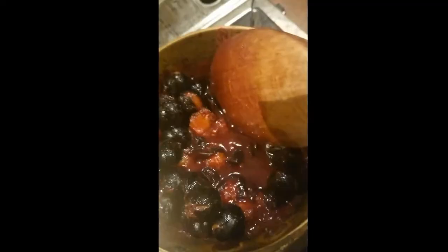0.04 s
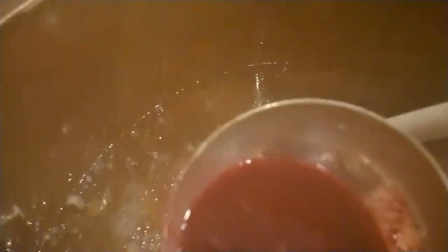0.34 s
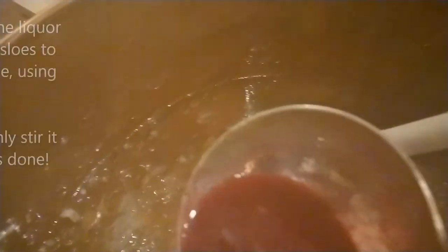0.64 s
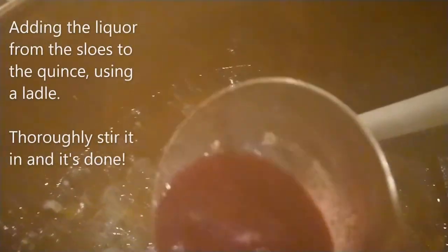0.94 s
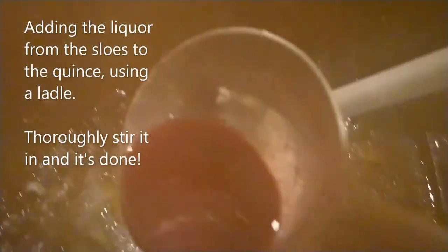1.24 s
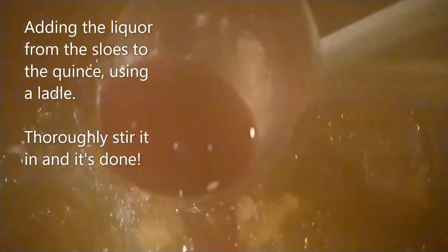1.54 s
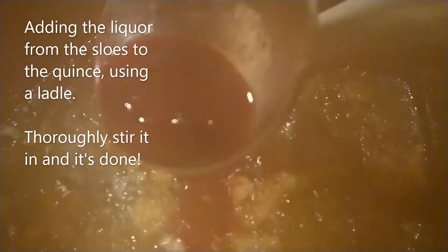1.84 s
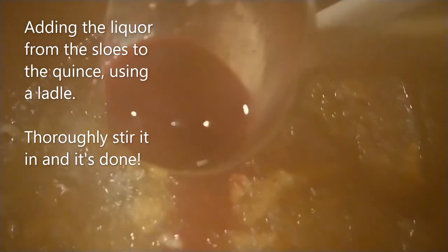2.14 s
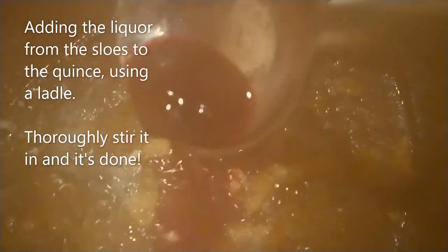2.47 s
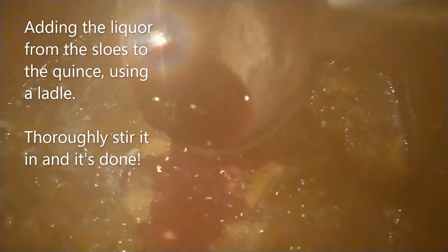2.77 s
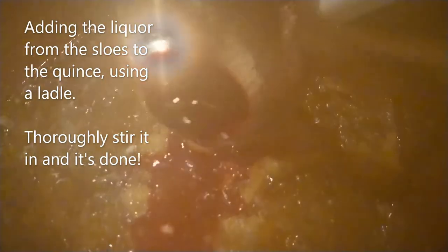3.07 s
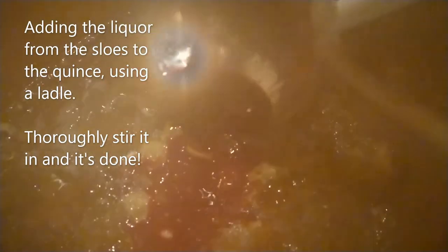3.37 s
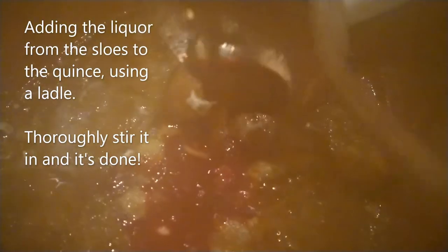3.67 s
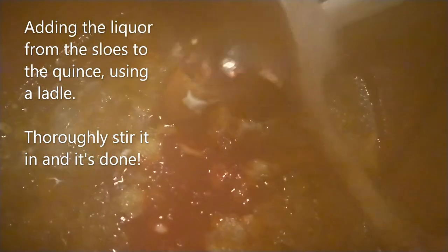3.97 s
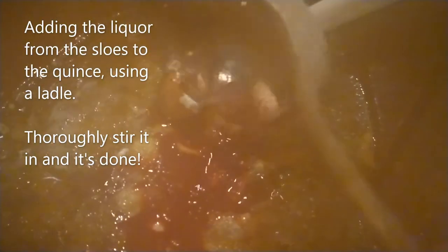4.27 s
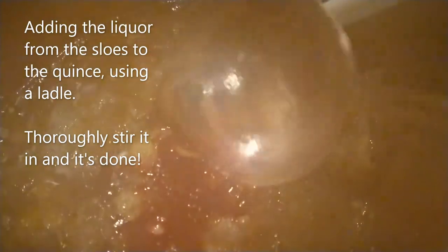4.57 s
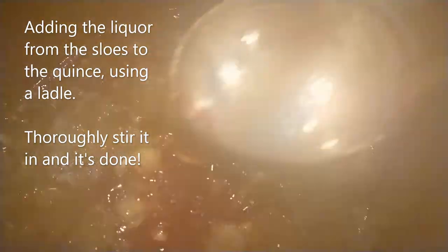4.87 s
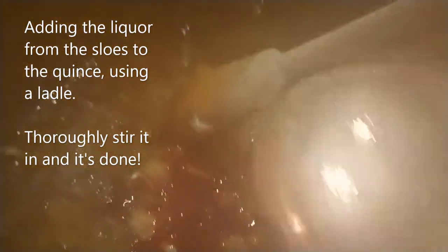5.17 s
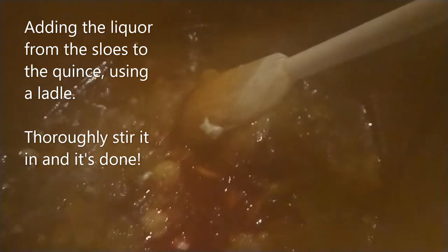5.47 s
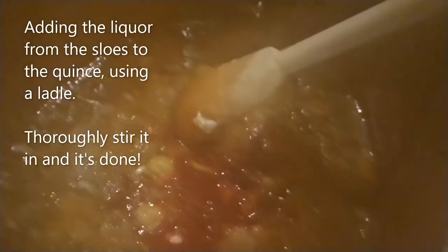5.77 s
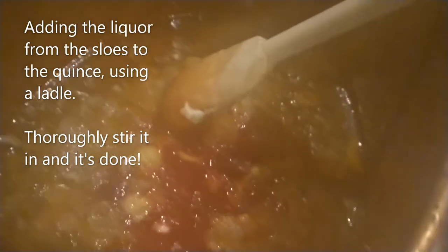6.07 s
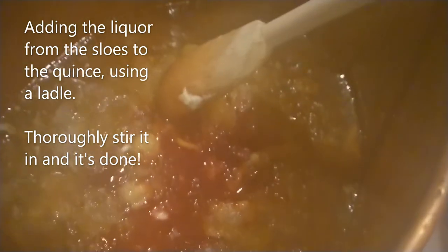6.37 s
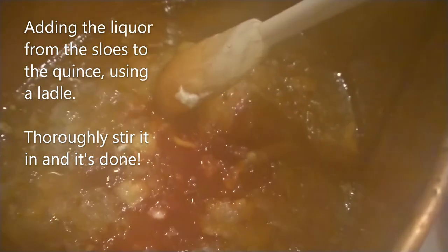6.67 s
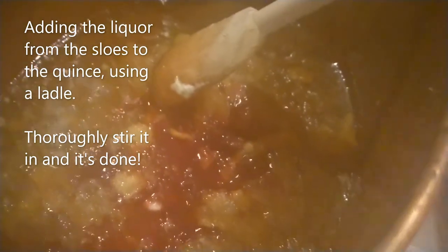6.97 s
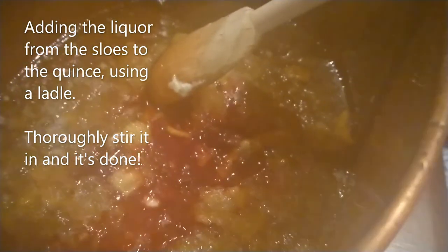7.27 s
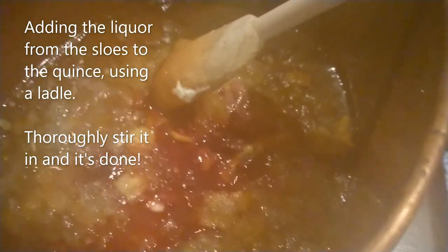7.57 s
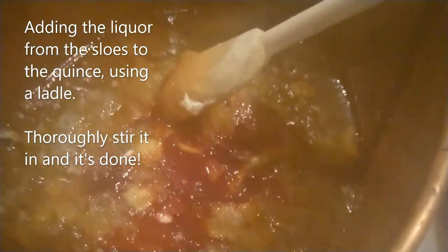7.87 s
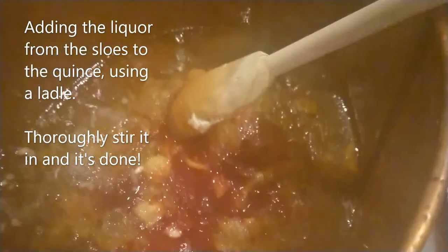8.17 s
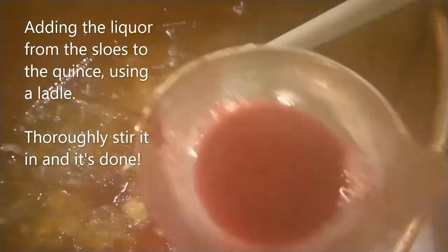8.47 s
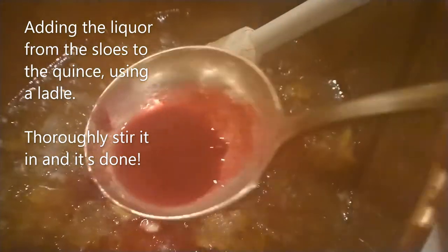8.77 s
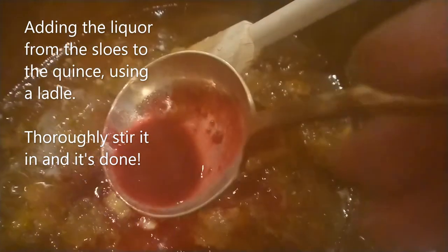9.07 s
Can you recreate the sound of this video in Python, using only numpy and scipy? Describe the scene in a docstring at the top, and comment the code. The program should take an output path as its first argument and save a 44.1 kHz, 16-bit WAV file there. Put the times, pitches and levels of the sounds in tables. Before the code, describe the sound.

After a quick squelch and a second of silence, fruit pulp bubbles and sizzles in a pan, spitting and plopping as juice is ladled in.

```python
"""A moment of wet stirring, about a second of silence, then fruit simmering in a deep steel pan.
Heard from just above the rim while a ladle of juice is tipped in, thousands of small bubbles burst
and ring the air in pan and ladle. A few spit sharply at the surface, larger ones pop and plop in the
pulp, and the cooler juice calms the froth and fizz. A kitchen hum lies under the simmer."""
import sys
import numpy as np
from scipy import signal
from scipy.fft import rfft, irfft
from scipy.io import wavfile
from scipy.ndimage import map_coordinates

SR = 44100
rng = np.random.default_rng(int(sys.argv[2]) if len(sys.argv) > 2 else 0)


def wav_record(signal):
    """Record a signal, one row per channel, as 16-bit PCM in the file named by sys.argv[1]."""
    frames = np.transpose(np.atleast_2d(signal))
    bounded = np.clip(frames, -1, 1)
    # unit amplitude maps onto the largest positive 16-bit level
    quanta = np.round(bounded * 32767).astype(np.int16)
    wavfile.write(sys.argv[1], SR, quanta)


N = 407035
T = np.arange(N) / SR

def amp(db):
    """Decibels to gain."""
    return 10 ** (np.asarray(db) / 20)

def unit_rms(x):
    """Scales a sound so that its centre signal has rms 1."""
    return x / np.sqrt(np.mean(np.atleast_2d(x).mean(0) ** 2) + 1e-20)

def curve(rows):
    """An automation line through (seconds, value) points."""
    return np.interp(T, *np.transpose(rows))

def swells(rows, half_s):
    """Bell-shaped rises or dips in dB, one at each row's moment."""
    return sum(db * np.exp(-((T - s) / half_s) ** 2) for s, db in rows)

def wander(per_s):
    """Slow random drift of rms 1."""
    hz = np.fft.rfftfreq(N, 1 / SR)
    return unit_rms(irfft(rfft(rng.standard_normal(N)) * (hz / per_s) * np.exp(-hz / per_s), N))

def add(mix, s, sound, pan_db=0):
    """Mixes a sound in at time s, leaning left by pan_db."""
    sound = sound * amp([[pan_db / 2], [-pan_db / 2]])
    part = mix[:, max(round(s * SR), 0):][:, :sound.shape[1]]
    part += sound[:, :part.shape[1]]

def band(x, lo_hz, hi_hz):
    """Gentle band-pass."""
    return signal.sosfilt(signal.butter(2, [lo_hz, hi_hz], "band", fs=SR, output="sos"), x)

def eq(x, table):
    """Minimum-phase EQ with one curve for each side."""
    hz, *sides = np.transpose(table)
    log_hz = np.log(abs(np.fft.fftfreq(4096, 1 / SR)) + 1)
    log_gain = np.log(amp([np.interp(log_hz, np.log(hz), side) for side in sides]))
    taps = np.fft.ifft(np.exp(signal.hilbert(log_gain).conj())).real[:, :2048]
    return signal.oaconvolve(np.atleast_2d(x), taps, axes=1)[:, :N]

def clicks(per_s, spread_db):
    """Impulses of random size at random moments."""
    size = amp(spread_db * np.minimum(rng.exponential(1, N), 5.5)) * rng.choice([-1, 1], N)
    return size * (rng.random(N) < per_s / SR)

def walls(t60, wet):
    """A click and its quick reflections between the pan walls, different at each side."""
    t = T[:2048]
    echoes = rng.standard_normal((2, len(t))) * amp(-60 * t / t60)
    echoes *= wet / np.linalg.norm(echoes, axis=1, keepdims=True)
    echoes[[0, 1], rng.integers(0, 20, 2)] += 1  # the direct sound
    return echoes

def crackle(per_s, spread_db, t60, wet, spots=14):
    """Bubbles bursting at many spots of the surface, each spot with its own reflections."""
    train, spot = clicks(per_s, spread_db), rng.integers(0, spots, N)
    heard = (signal.oaconvolve((train * (spot == k))[None], walls(t60, wet), axes=1)
             for k in range(spots))
    return unit_rms(sum(heard)[:, :N])

def pings(lo_hz, hi_hz, per_s, cycles, sizes=30):
    """Small bubbles of many sizes each ring for a few cycles."""
    out, t = np.zeros((2, N)), T[:SR // 60]
    for hz in np.geomspace(lo_hz, hi_hz, sizes):
        ping = np.sin(2 * np.pi * hz * t) * np.exp(-hz * t / cycles)
        heard = signal.fftconvolve(ping[None], walls(t60=.012, wet=1.1), axes=1) / np.sqrt(hz)
        out += signal.oaconvolve(clicks(per_s / sizes, spread_db=2.6)[None], heard, axes=1)[:, :N]
    return unit_rms(out)

def ring(drive, modes):
    """Damped air resonances, heard with their own strength at each side."""
    t, response = T[:SR // 8], 0
    for hz, width_hz, left_db, right_db in modes:
        mode = np.sqrt(width_hz) * np.exp(-np.pi * width_hz * t) * np.sin(2 * np.pi * hz * t)
        response += amp([[left_db], [right_db]]) * mode
    return signal.oaconvolve(drive[None], response, axes=1)[:, :N]

# Dark room tone. Each row: frequency in Hz, left and right gain in dB.
ROOM_EQ = [(22, -10, -8), (54, 6, -12.5), (126, 0, 1), (245, -2.5, -12), (535, -7.5, -5.5),
           (1950, -39, -54)]
# Soft handling thumps. Each row: time in seconds, peak in dB before panning, lean to the left in dB.
HAND_BUMPS = [(1.22, -53, 10), (1.37, -52, 14), (2.41, -52, 0), (3.19, -48, 4), (3.25, -53, 8),
              (4.18, -54, -4), (5.01, -48, -3), (6.43, -54, -6), (7.32, -54, -2), (8.03, -53, 5)]
HUM_HZ, HUM_DB = 100, -72

def kitchen():
    """Low room noise that eases as the hand settles, mains hum and handling bumps."""
    noise = band(rng.standard_normal((2, N)) + .6 * rng.standard_normal(N), 32, 3000)
    rumble = amp(-62.5 - 0.44 * (T - T.mean())) * unit_rms(eq(noise, ROOM_EQ))
    out = rumble + amp(HUM_DB) * np.sin(2 * np.pi * HUM_HZ * T)
    age = T[:SR // 4] / .018  # a bump peaks after 18 ms
    for s, db, pan_db in HAND_BUMPS:
        push = band(rng.standard_normal(len(age)), 40, 150) * age * np.exp(-age)
        add(out, s - .01, amp(db) * push / abs(push).max(), pan_db)
    return out

# The tone of wet fruit. Each row: frequency in Hz, left and right gain in dB.
STIR_EQ = [(59.8, -9, -26.5), (150, -2.5, -1.5), (320, -8.5, -18.5), (604, -1.5, -13.5),
           (1180, -8.5, -14.5), (1860, -6, -20), (2660, -14, -13), (4500, -7.5, -13.5), (6000, -9, -35),
           (9000, -18, -31.5), (15000, -21.5, -43)]
# Wet smacks under the spoon. Each row: start in seconds, relative level in dB.
SPOON_SMACKS = [(0.005, -22.5), (0.029, -33.5), (0.067, -42), (0.09, -27), (0.096, -38), (0.129, -40),
                (0.149, -29), (0.158, -26), (0.169, -27.5)]

def stirring():
    """A wooden spoon turns wet berries: squelch, a hollow gurgle and a few smacks."""
    squelch = unit_rms(eq(crackle(per_s=3300, spread_db=4, t60=.011, wet=1.1), STIR_EQ))
    cavities = [(340, 57, -1.4, -6.5), (1866, 410, -.62, -27)]
    gurgle = unit_rms(ring(clicks(per_s=930, spread_db=-3), cavities)) * np.minimum(T / .075, 1)
    smacks = np.zeros((2, N))
    for s, db in SPOON_SMACKS:
        add(smacks, s, amp(db + 14.5) * walls(t60=.022, wet=2.23))
    return amp(-50) * (squelch + gurgle) + eq(smacks, STIR_EQ)

# The froth's fader. Each row: time in seconds, level in dB.
FROTH_LEVEL = [(1.1, -57.5), (1.9, -53), (3.0, -56.5), (4.2, -59), (5.2, -69), (9.2, -69.5)]
# Its tone. Each row: frequency in Hz, left and right gain in dB.
FROTH_EQ = [(504, -7.5, -13.5), (930, -8.5, -8), (1370, -4.5, 0.5), (2070, -17, -41), (3140, -5, -15),
            (4400, -25, -5.5), (4960, -7, -10), (5370, -2.5, -17.5), (6500, -15, -32), (9450, -23.5, -23)]

def froth():
    """A patch of froth crackles, calming as the cooler juice runs in."""
    bubbles = crackle(per_s=5000, spread_db=5, t60=.031, wet=1.9)
    return amp(curve(FROTH_LEVEL)) * unit_rms(eq(bubbles, FROTH_EQ))

# Bright top end of the fizz. Each row: frequency in Hz, left and right gain in dB.
FIZZ_EQ = [(1560, -80, -64), (3910, 12, -28), (5600, 9.5, 3), (8900, 2.5, -1), (10370, 5, 3.5),
           (11600, -1.5, -2), (15000, -12.5, -9.5)]
# Sprays of very fine spitting. Each row: centre in seconds, lift of the snaps in dB.
FINE_SPRAYS = [(1.5, 2), (2.37, 2), (2.62, 3), (3.37, 2.5), (3.52, 2.5), (3.95, 3), (4.3, 2), (5.75, 3),
               (6.06, 3), (7.22, 3), (7.65, 3), (8.9, 4), (9.14, 3)]
FIZZ_START_DB, FIZZ_SETTLED_DB, CALMING_S = -56.5, -75, 9.1

def fizz(surge_db):
    """Tiny films snap and small bubbles tick in sputtering clumps; the cooler juice calms them."""
    snaps = unit_rms(eq(crackle(per_s=2700, spread_db=3.5, t60=.044, wet=7.8), FIZZ_EQ))
    heat = np.exp(-np.maximum(T - SIMMER_START_S, 0) / CALMING_S)
    sputter_db = 1.5 * wander(per_s=7) + swells(FINE_SPRAYS, half_s=.055)
    level_db = FIZZ_SETTLED_DB + (FIZZ_START_DB - FIZZ_SETTLED_DB) * heat + 1.3 * surge_db + sputter_db
    ticks = amp(-64.5 + .7 * (level_db - level_db.mean())) * pings(4200, 14000, per_s=420, cycles=2)
    return amp(level_db) * snaps + ticks

# Air modes of the ladle. Each row: base pitch and width in Hz, left and right gain in dB.
LADLE_MODES = [(1855, 66, -20, 4), (2180, 170, -14, -5.5), (3030, 130, -26, .5), (3790, 100, -26, -2)]
# The ladle's fader. Each row: time in seconds, level in dB before surges.
LADLE_LEVEL = [(1.1, -57), (1.42, -54), (1.6, -48.5), (2.3, -47.5), (3.3, -48), (3.85, -49.8), (4.4, -55.5),
               (4.9, -56), (8.6, -66), (9.1, -59)]
# Its pitch bend. Each row: time in seconds, pitch ratio.
LADLE_BEND = [(1.1, 1), (1.9, 1.015), (3.0, .995), (4.0, .96), (9.2, .955)]

def ladle_ring(surge_db):
    """Small bubbles ring the air in the ladle, whose pitch sinks as the juice leaves it."""
    bowl = ring(band(clicks(per_s=900, spread_db=1.5), 1885, 3970), LADLE_MODES)
    read_position = np.cumsum(curve(LADLE_BEND))
    bent = np.array([map_coordinates(side, [read_position], order=3) for side in bowl])
    return amp(curve(LADLE_LEVEL) + .67 * surge_db) * unit_rms(bent)

# Deep and high air modes of the pan. Each row: pitch and width in Hz, left and right gain in dB.
DEEP_MODES = [(420, 25, 0, -1.5), (845, 100, -14, -8.5), (1060, 230, -6.5, -8.5)]
HIGH_MODES = [(1328, 60, -17, -11), (1778, 75, -18.5, -11), (2465, 145, -25, 0), (2660, 120, -20, -6.5),
              (2890, 120, -28, -8)]
# Their faders; the high ring is strongest with the ladle out of the way.
# Each row: time in seconds, level in dB before surges.
DEEP_LEVEL = [(1.1, -53.3), (1.9, -52.8), (2.7, -54.3), (2.95, -50), (3.3, -55.5), (3.55, -53),
              (4.2, -52.3), (4.7, -52.6), (5.05, -56), (5.8, -56.3), (6.8, -56), (7.5, -56), (8.15, -58),
              (8.65, -55.5), (9.2, -55.5)]
HIGH_LEVEL = [(1.1, -55), (1.6, -54), (2.3, -56), (3.4, -53), (4.5, -53), (4.95, -52.5), (5.15, -49.5),
              (5.5, -49.6), (5.9, -52), (6.2, -50), (6.38, -51.5), (6.7, -48.7), (7.5, -50.3),
              (7.95, -49.3), (8.6, -50), (9.0, -55)]

def pan_ring(surge_db):
    """Large bubbles ring the deep air modes of the pan, small ones the high modes."""
    large = band(clicks(per_s=2500, spread_db=2), 370, 1300)
    small = band(clicks(per_s=800, spread_db=.8), 1280, 5400)
    deep = amp(curve(DEEP_LEVEL) + .24 * surge_db) * unit_rms(ring(large, DEEP_MODES))
    high = amp(curve(HIGH_LEVEL) + .27 * surge_db) * unit_rms(ring(small, HIGH_MODES))
    return deep + high

# Round plops from under the pulp. Each row: start in seconds, peak in dB.
DEEP_PLOPS = [(1.445, -42), (1.865, -41), (2.607, -44), (2.95, -41), (3.836, -33), (5.82, -42),
              (8.595, -44)]

def plops():
    """A big bubble opens slowly, so its push wakes only the deep resonances of the pan."""
    push = np.zeros(N)
    for s, db in DEEP_PLOPS:
        push[round(s * SR)] = amp(db)
    sound = ring(band(push, 330, 2000), DEEP_MODES)
    return sound * push.max() / abs(sound.mean(0)).max()

# Pops in the pulp, off to the right. Each row: start in seconds, peak in dB before panning, pitch in Hz.
PULP_POPS = [(1.8642, -33, 3060), (2.2769, -34, 3000), (2.5836, -34, 3150), (2.9123, -37, 3090),
             (3.2745, -36, 2180), (3.4112, -35, 2400), (4.3171, -38, 3200), (5.703, -39, 2360),
             (6.2103, -38, 2440), (7.3373, -37, 2900), (7.5797, -37, 2690), (8.545, -38, 2930),
             (8.8793, -39, 2870), (9.1496, -39, 2670)]
POP_RING_S, POP_SNAP_S = .004, .002

def pops():
    """A larger bubble pops: a wet snap, and a short note that rises as its cavity closes."""
    out, t = np.zeros((2, N)), T[:SR // 30]
    for s, db, hz in PULP_POPS:
        note = np.sin(2 * np.pi * hz * t * (1 + 2 * t)) * np.exp(-t / POP_RING_S)
        snap = unit_rms(band(rng.standard_normal(len(t)), hz / 2, hz * 1.44)) * np.exp(-t / POP_SNAP_S)
        sound = signal.fftconvolve((note + snap)[None], walls(t60=.03, wet=1), axes=1)
        add(out, s, amp(db) * sound / abs(sound).max(1, keepdims=True), pan_db=-13)
    return out

# Sharp accents at the surface. Each row: start in seconds, relative peak in dB, pitch in Hz,
# lean to the left in dB, share of clear tone from 0 to 1.
SURFACE_SPITS = [(1.3250, -33, 11200, 3, .25), (1.744, -36, 5800, 7, .4), (2.2588, -26, 5470, 9, .6),
                 (2.6168, -40.5, 10500, 3, .1), (2.648, -37, 14600, -2, .15), (3.3588, -27.5, 4550, -5, .7),
                 (3.5534, -37.5, 13300, 4, .25), (3.847, -42, 5900, 3, .2), (4.147, -40, 5580, 4, .2),
                 (4.4104, -39, 4800, 2, .3), (4.542, -40, 4700, 2, .3), (5.4864, -36.5, 5290, 5, .4),
                 (5.925, -41, 5700, 7, .2), (6.050, -38.5, 4800, -2, .15), (6.351, -48, 10500, 2, .2),
                 (6.3694, -39.5, 5200, 2, .2), (6.7255, -34.5, 8200, 5, .03), (6.729, -37, 5200, 2, .2),
                 (6.903, -45, 7500, 3, .1), (6.910, -43, 9500, 3, .05), (7.108, -41, 4700, 4, .3),
                 (7.464, -42, 4900, 4, .3), (7.609, -41, 5200, 4, .2), (7.758, -43, 5200, 4, .2),
                 (7.9735, -44, 5200, 5, .15), (8.258, -47, 12000, 2, .1), (8.2791, -41, 6500, 4, .1),
                 (8.4517, -43, 5900, 5, .2), (8.484, -44, 6500, 4, .1), (8.6288, -41, 5000, -1, .3),
                 (9.046, -46.5, 9500, -2, .1)]

def spits():
    """A film tears with a bright snap and a short rasp; the open cavity sings for a few milliseconds."""
    out, t = np.zeros((2, N)), T[:SR // 50]
    age = t / .0009  # the envelope peaks after 0.9 ms
    for s, db, hz, pan_db, tone in SURFACE_SPITS:
        ping = np.sin(2 * np.pi * hz * t * (1 + 3 * t))
        rasp = unit_rms(band(rng.standard_normal(len(t)), hz / 1.35, hz * 1.22))
        snap = amp(-21) * unit_rms(band(rng.standard_normal(len(t)), 6000, 14000))
        burst = (tone * ping + .42 * (1 - tone) * rasp + snap) * age * np.exp(-age)
        sound = signal.fftconvolve(burst[None], walls(t60=.07, wet=.4), axes=1)
        add(out, s, amp(db + 3) * sound / abs(sound).max(1, keepdims=True), pan_db)
    return out

# Flurries of bubbles and the lulls between. Each row: centre in seconds, swell or dip in dB.
BOIL_FLURRIES = [(1.87, 1.3), (2.265, 1.3), (2.92, 1), (3.18, 1.8), (3.28, 1.5), (3.77, 1.2), (3.85, 1.8),
                 (3.95, 1), (4.11, 1.5), (4.54, 1.3), (4.84, 1.2), (4.99, 2.3), (5.13, 1.8), (6.21, 2),
                 (6.31, 1.5), (6.43, 2.6), (6.61, 1.2), (6.99, 2.3), (7.12, 2), (7.33, 1.2), (7.59, 2.2),
                 (7.88, 1.8), (8.02, 2), (8.54, 1.8), (8.72, 1.5), (8.87, 1.3), (9.04, 1.7), (9.16, 2.2)]
BOIL_LULLS = [(1.19, -2), (2.32, -1.8), (3.08, -1.5), (3.66, -1.3), (4.06, -2), (4.91, -2), (5.05, -1.5),
              (5.65, -1.2), (6.26, -2.2), (6.56, -2), (7.06, -2.2), (7.49, -1.5), (7.7, -3), (8.35, -1.2),
              (8.96, -1.3)]

def surges():
    """The boil never runs evenly: flurries, lulls and random surges, in dB about its slow course."""
    return swells(BOIL_FLURRIES, half_s=.03) + swells(BOIL_LULLS, half_s=.03) + .45 * wander(per_s=8.1)

# How hard the fruit boils, for blips and sizzle. Each row: time in seconds, relative level in dB.
BOIL_LEVEL = [(1.1, -47.5), (1.45, -45.5), (1.9, -45.5), (2.6, -44.5), (3.3, -45.5), (4.2, -45), (4.5, -47),
              (5.1, -46), (5.8, -47), (6.7, -46.5), (7.05, -45.5), (7.35, -47.5), (7.95, -46),
              (8.25, -47.5), (9.2, -45.5)]

def blips(surge_db):
    """Larger bubbles ring briefly at the surface, mostly on the right."""
    return amp(curve(BOIL_LEVEL) + surge_db + [[-26], [-11]]) * pings(2200, 4200, per_s=550, cycles=9)

# The body of the sizzle. Each row: frequency in Hz, left and right gain in dB.
SIZZLE_EQ = [(272, -33.5, -34.5), (486, -8.5, -10), (734, -21.5, -28), (953, -7, -8), (1165, -19.5, -17.5),
             (1390, -14, -11.5), (1880, -12.5, -6), (2650, -20, -4.5), (3750, -25, -2.5), (4550, -22, -7.5),
             (5970, -15, -27.5), (6400, -28.5, -42.5), (8750, -34, -36), (16000, -58, -68)]

def sizzle(surge_db):
    """Thousands of bursting bubbles merge into a dense sizzle that comes in clumps."""
    bubbles = crackle(per_s=8000, spread_db=3.5, t60=.041, wet=1)
    return amp(curve(BOIL_LEVEL) - 1.5 + surge_db) * unit_rms(eq(bubbles, SIZZLE_EQ))

STIR_END_S, SIMMER_START_S = .17, 1.09

def scene():
    """The stirring fades out fast; after a silence the simmering starts at once."""
    surge_db = surges()
    body = sizzle(surge_db) + froth() + pops() + pan_ring(surge_db) + ladle_ring(surge_db)
    simmer = body + fizz(surge_db) + blips(surge_db) + spits() + plops() + kitchen()
    stir_fade = amp(-900 * np.clip(T - STIR_END_S, 0, .2))
    return stir_fade * stirring() + (T >= SIMMER_START_S) * simmer

NOTCH_HZ, TOP_HZ = 5950, 15750

def record(dry):
    """The right microphone port is deaf in a narrow band; both sides lose the highest treble."""
    hz = np.fft.rfftfreq(N, 1 / SR)
    notch = amp(-30 * np.exp(-((hz - NOTCH_HZ) / 260) ** 2))
    ports = np.array([dry[0], irfft(rfft(dry[1]) * notch, N)])
    low_pass = signal.firwin(511, TOP_HZ, window=("kaiser", 9), fs=SR)
    return signal.oaconvolve(ports, low_pass[None], "same")

dry = scene()
out = record(dry)
wav_record(out)
```